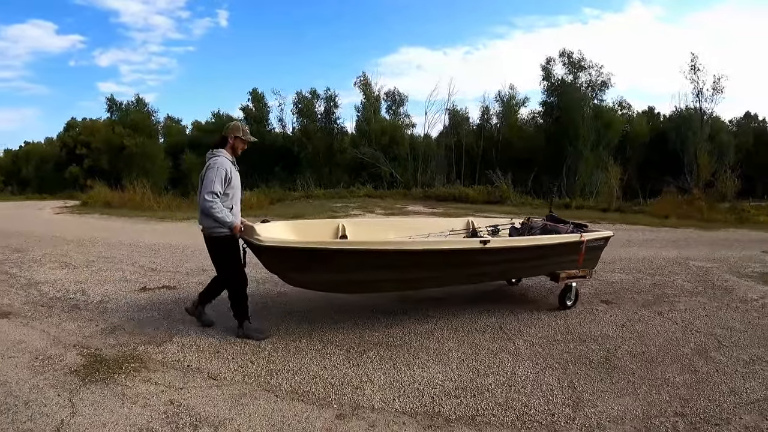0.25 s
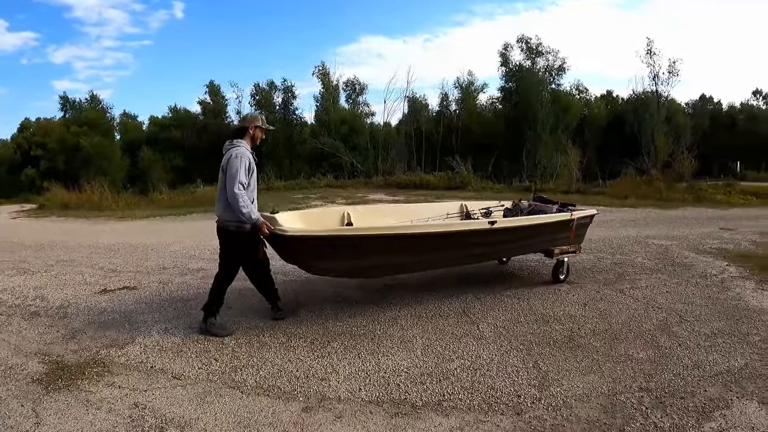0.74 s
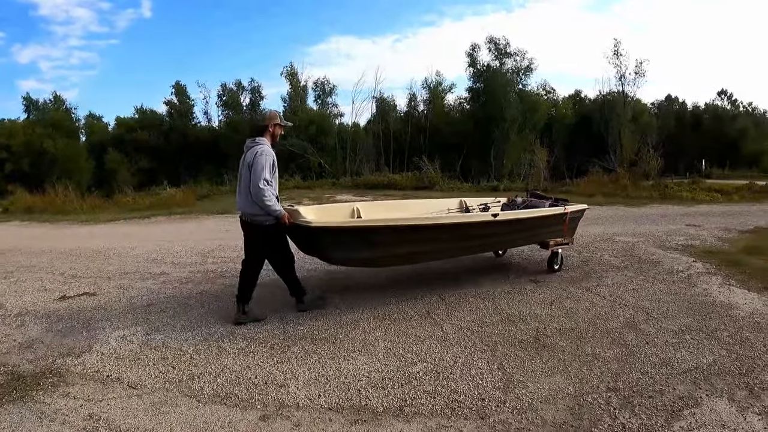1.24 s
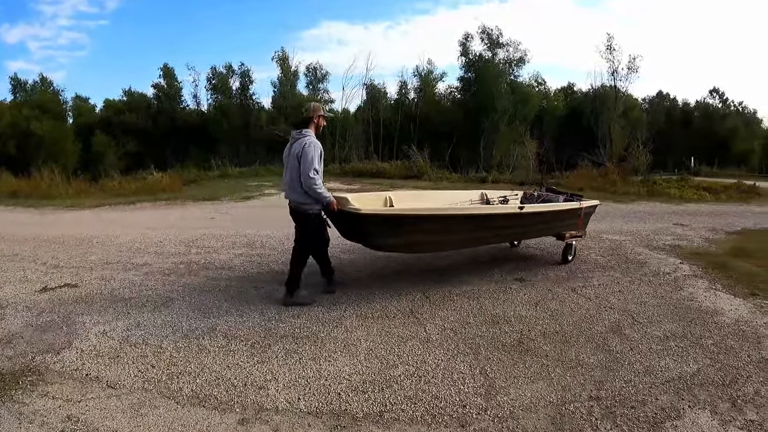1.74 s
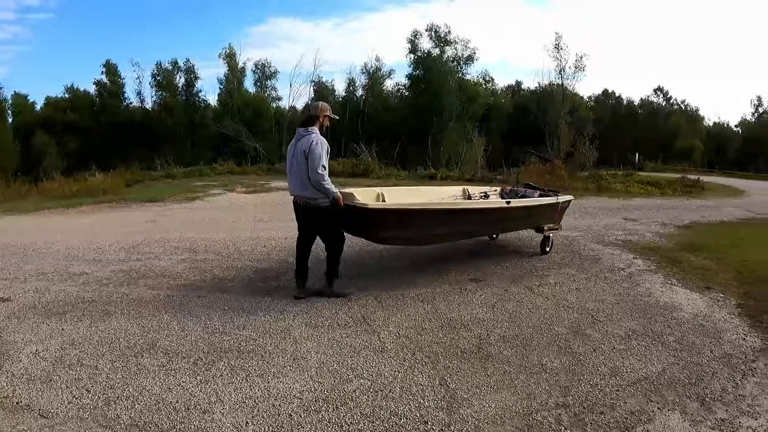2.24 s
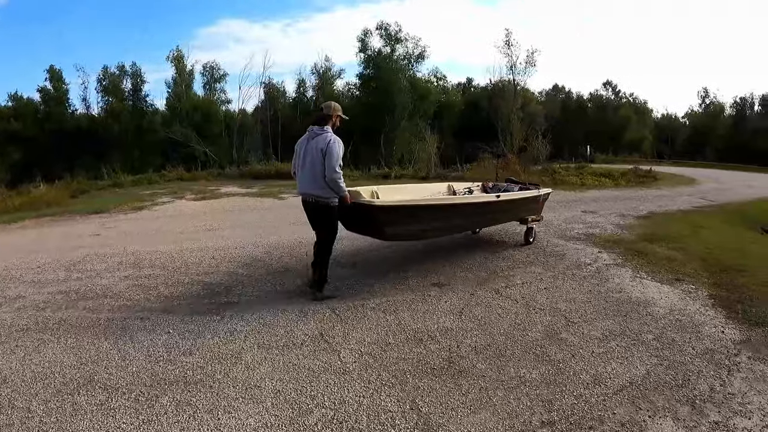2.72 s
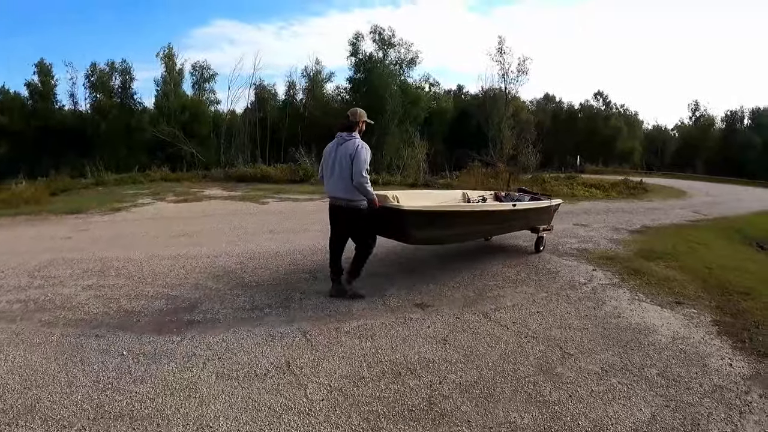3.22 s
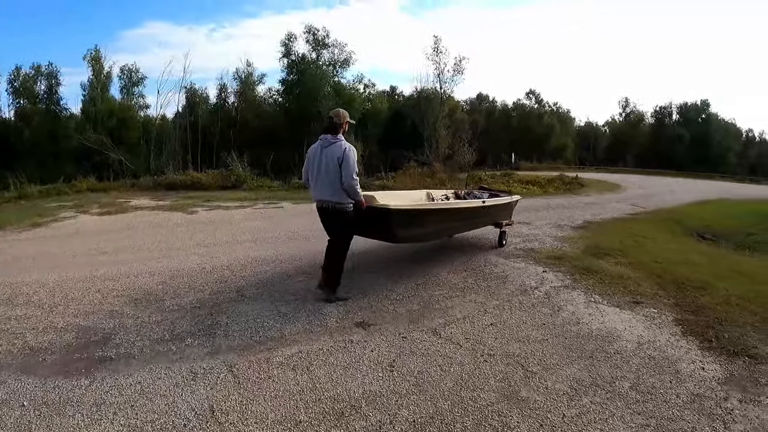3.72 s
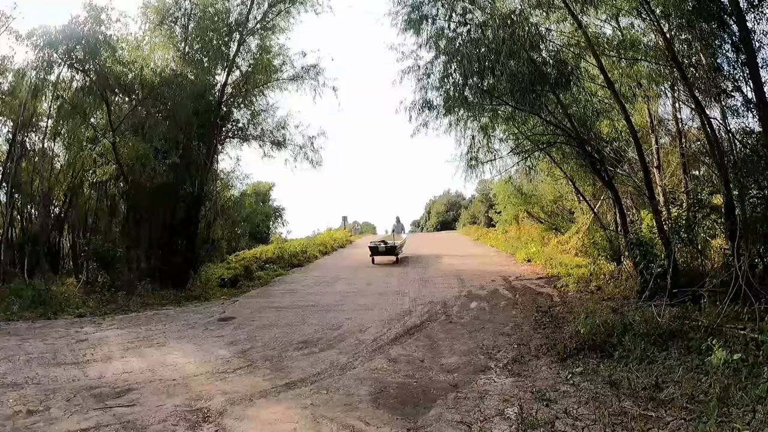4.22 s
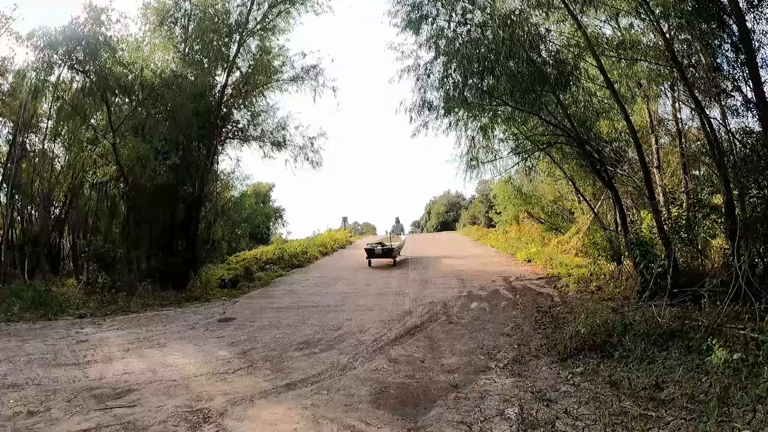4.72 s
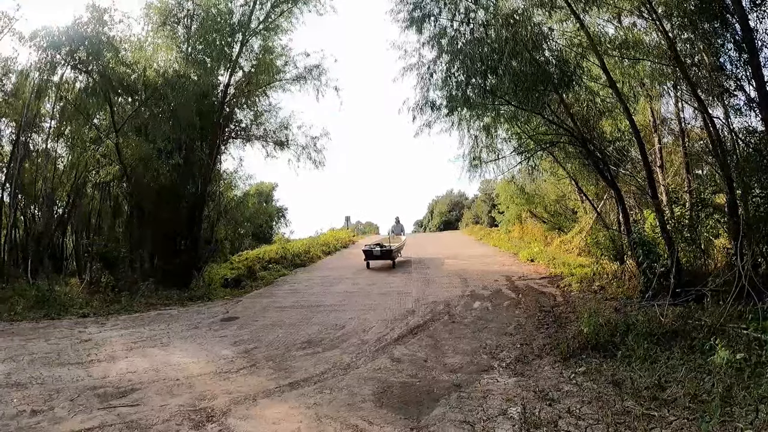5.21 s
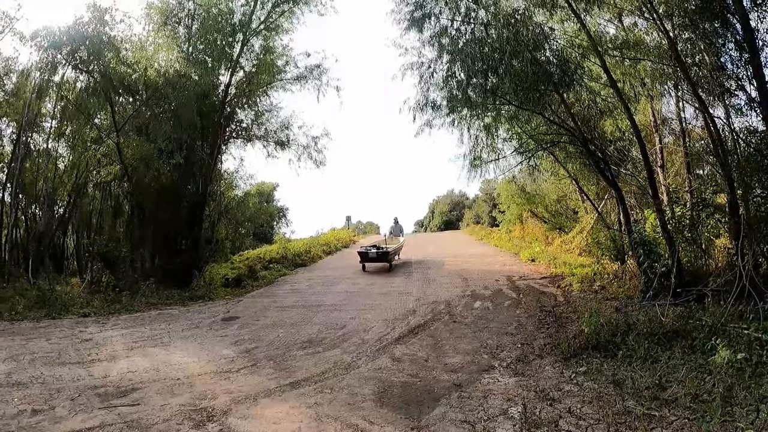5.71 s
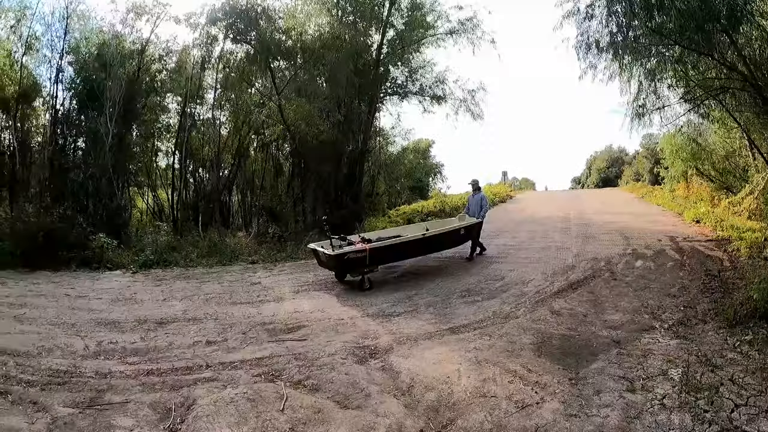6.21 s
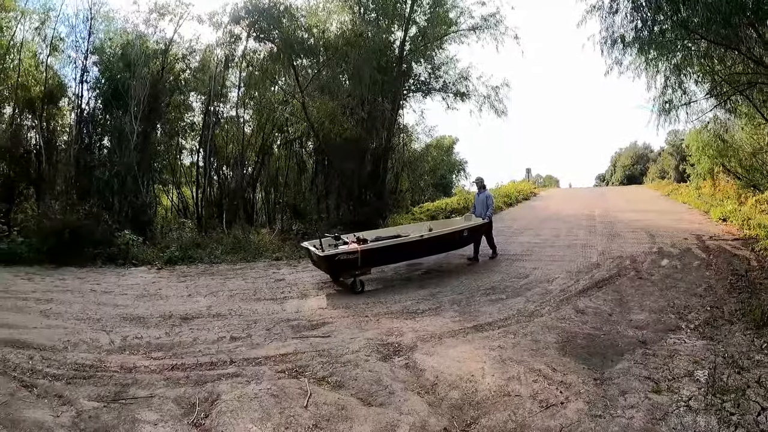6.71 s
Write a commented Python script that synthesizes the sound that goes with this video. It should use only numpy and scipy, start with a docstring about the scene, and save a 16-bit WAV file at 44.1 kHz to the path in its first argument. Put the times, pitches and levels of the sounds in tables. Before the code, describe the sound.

Small wheels rumble and crunch loudly over gravel under a booming hollow hull in wind, then abruptly a quiet lane with distant knocks and insects.

```python
"""A small boat is pushed on dolly wheels over a gravel road: grains and pebble ticks make the crunch,
shaped noise the boom and rattle of the hull, short resonances the stones and thuds, noise the wind.
Then, suddenly, a quiet lane: the boat drones and knocks far off under a soft hiss,
with a katydid of rasping noise strokes, a cricket of sagging tones and an echo from the trees."""
import sys
import numpy as np
from scipy import signal
from scipy.fft import rfft, irfft, next_fast_len
from scipy.io import wavfile
from scipy.ndimage import uniform_filter1d, minimum_filter1d, map_coordinates

SR = 44100
rng = np.random.default_rng(int(sys.argv[2]) if len(sys.argv) > 2 else 0)


def output_pcm(signal):
    """Save a mono or channel-first signal as 16-bit PCM at the path in sys.argv[1].

    Samples are clipped to [-1, 1] before scaling.
    """
    pcm = np.clip(np.atleast_2d(signal).T, -1, 1) * 32767
    wavfile.write(sys.argv[1], SR, np.round(pcm).astype(np.int16))


N = 306495
CUT_S = 4.197  # the near place gives way to the quiet lane

# All levels are before panning and limiting; spectra shape the tone, not the loudness.
# the wheels dig into loose patches with a duller crunch: middle_s, level_db
WHEEL_DIGS = [(0.32, -44), (2.072, -48.5), (2.56, -51), (3.141, -49.5), (3.52, -51.5), (4.33, -61.5),
              (4.791, -60), (5.07, -56.5), (5.451, -59.5), (5.6, -55.5), (6.026, -55), (6.361, -58),
              (6.89, -53)]
# hollow knocks of the far boat: start_s, peak_db, pitch_hz
BOAT_KNOCKS = [(4.313, -34, 940), (5.399, -36, 950), (5.744, -35, 947)]
# tone of crunching stones: frequency_hz, relative_gain_db
CRUNCH_TONE = [(300, 3.5), (700, -3.5), (1150, 4.5), (3300, -9), (8000, -20), (14000, -52)]


def amp(db):
    """Decibels to amplitude."""
    return 10 ** (np.asarray(db) / 20)


def unit(x):
    """Scale a sound to rms 1."""
    return x / np.sqrt(np.mean(x ** 2) + 1e-20)


def clock():
    """The time of every sample in seconds."""
    return np.arange(N) / SR


def wobble(rate):
    """A smooth random curve, rate knots a second."""
    return map_coordinates(rng.standard_normal(int(N * rate / SR) + 4), [clock() * rate])


def coloured(x, spectrum):
    """Pass x through a causal (minimum-phase) filter with the given (Hz, dB) gain."""
    m = 2 * next_fast_len(min(x.shape[-1], (x.shape[-1] + SR // 2) // 2), real=True)
    hz, db = np.transpose(spectrum)
    gain = amp(np.interp(np.log(np.fft.rfftfreq(m, 1 / SR) + 1), np.log(hz), db))
    # folding the cepstrum forward in time makes the filter causal
    cepstrum = irfft(np.log(gain), m)
    cepstrum[1:m // 2] *= 2
    cepstrum[m // 2 + 1:] = 0
    response = np.exp(rfft(cepstrum))
    return irfft(rfft(x, m) * response, m)[..., :x.shape[-1]]


def noise(spectrum):
    """Steady coloured noise of rms 1."""
    return unit(coloured(rng.standard_normal(N), spectrum))


def peaked(spectrum, hz, peak_db, octaves):
    """A spectrum with one resonance added at hz."""
    f, db = np.transpose(spectrum)
    grid = np.geomspace(f[0], f[-1], SR // 400)
    base_db = np.interp(np.log(grid), np.log(f), db)
    resonance_db = peak_db / (1 + (np.log2(grid / hz) / octaves) ** 2)
    return np.column_stack([grid, base_db + resonance_db])


def grains(spectrum, rate, spread_db, bed_db, life, size=N):
    """Random contacts of very unequal size, each a short burst, over a bed of countless tiny ones."""
    sizes = amp(spread_db * np.minimum(rng.exponential(size=size), 3))
    contacts = sizes ** 2 * (rng.random(size) < rate / SR)
    energy = signal.lfilter([1], [1, -np.exp(-2 / (life * SR))], contacts)
    bursts = unit(np.sqrt(energy) * rng.standard_normal(size))
    bed = amp(bed_db) * rng.standard_normal(size)
    return unit(coloured(bursts + bed, spectrum))


def patchy():
    """White noise of rms 1 that flickers in small patches of time and pitch."""
    z = signal.stft(rng.standard_normal(N), nperseg=512)[2]
    patches = uniform_filter1d(rng.standard_normal(z.shape), size=10, axis=0)
    patches = uniform_filter1d(patches, size=5, axis=1)
    return unit(signal.istft(z * amp(2.5 * unit(patches)), nperseg=512)[1][:N])


def pebbles(spectrum, rate, spread_db, bed_db):
    """Stones tick in clusters, each at its own pitch, over a patchy bed of finer sand."""
    crowding = np.cumsum(amp(4 * wobble(25)))
    when, pitch, size, loose = rng.random((int(rate * N / SR), 4)).T
    start = np.searchsorted(crowding, when * crowding[-1])
    hz = 500 * (11000 / 500) ** pitch[:, None]  # 500 to 11000 Hz
    age = np.arange(SR // 100)
    cycles = hz * age / SR
    life = 1 + 5.7 * loose[:, None] ** 2  # in cycles: a bedded stone hardly rings, a loose one a little
    strength = amp(spread_db * np.minimum(-np.log(1 - size), 4))[:, None]
    ring = np.sin(2 * np.pi * cycles) * np.exp(-cycles / life)
    ticks = strength * hz / np.sqrt(life) * ring
    ticking = unit(np.bincount((start[:, None] + age).ravel(), ticks.ravel(), N)[:N])
    return unit(coloured(ticking + amp(bed_db) * patchy(), spectrum))


def shaken(s, db, build, settle):
    """Power of the hull's shaking: it builds up to time s, then settles."""
    age = clock() - s
    return amp(db) ** 2 * np.exp(-2 * np.maximum(-age / build, age / settle))


def add(track, s, sound):
    """Mix a sound into a track from time s on."""
    part = track[max(round(s * SR), 0):][:len(sound)]
    part += sound[:len(part)]


def wide(mid, side):
    """Left and right from a mid and a side signal."""
    return np.array([mid + side, mid - side])


def wind():
    """Eddies beat on the microphone in uneven lumps."""
    # slow swells of the wind: time_s, level_db
    gusts = [(0.0, -30), (0.16, -20), (1.43, -20.5), (2.08, -22.5), (2.86, -19), (3.69, -30), (3.98, -26),
             (4.17, -29.5)]
    # low rumble: frequency_hz, relative_gain_db
    buffet_tone = [(12, -27), (26, -0.5), (60, 1.5), (100, -6), (160, -16), (300, -42), (800, -86)]
    gust_s, gust_db = np.transpose(gusts)
    lumps = amp(1.33 * wobble(18))
    return amp(np.interp(clock(), gust_s, gust_db)) * unit(lumps * noise(buffet_tone))


def near_dolly():
    """Wheels crush stones and grit; the shaken hull booms and, shaken harder, rattles ever more."""
    # rough patches of road that set the hull booming: worst_s, boom_db, build_up_s
    rough_patches = [(0.394, -19.5, 0.15), (0.619, -23.5, 0.06), (1.5, -28.5, 0.036), (1.629, -28.5, 0.038),
                     (2.355, -21.5, 0.094), (2.72, -29, 0.27), (3.3, -31.5, 0.52), (3.839, -33, 0.047)]
    # tones of hull boom, hull rattle, stones and fine grit: frequency_hz, relative_gain_db
    boom_tone, rattle_tone = [(50, -17.5), (105, 2), (200, -1.5), (290, -8), (500, -29.5), (1200, -82.5)], [(170, -7), (380, 6), (520, 1), (780, -5), (1100, -21.5),
                                            (6000, -93.5)]
    gravel_tone, grit_tone = [(300, -1), (550, 1), (900, 7.5), (1800, 1.5), (2300, -9.5), (3100, -9.5),
                              (5000, -30.5), (12000, -37)], [(1000, -4.5), (3000, -4.5), (4500, -8), (8700, -19.5),
                                              (9500, -29), (14000, -52)]
    # the dolly passes the microphone and rolls away
    nearest_s, nearest_m, walk_m_per_s = 1.72, 3.85, 1.22
    # on even road with the dolly at its nearest; the rattle at that same shake
    boom_db, rattle_db, grit_db = -36, -51.5, -57
    rattle_db_per_boom_db = 1.306
    # the wheels run from fine gravel onto coarse: middle and length of the change, level on each
    coarse_s, coarse_takes_s = 1.25, 0.56
    fine_db, coarse_db = -55, -50

    nearness = nearest_m / np.hypot(nearest_m, walk_m_per_s * (clock() - nearest_s))
    rough_power = sum(shaken(*patch, settle=0.11) for patch in rough_patches)
    shake = np.sqrt((amp(boom_db) * nearness) ** 2 + rough_power)
    boom = shake * grains(boom_tone, rate=150, spread_db=6, bed_db=-2.0, life=0.0037)

    rattle_level = amp(rattle_db) * (shake / amp(boom_db)) ** rattle_db_per_boom_db
    rattle = rattle_level * grains(rattle_tone, rate=200, spread_db=3, bed_db=-5.5, life=0.0028)

    coarse = np.clip((clock() - coarse_s) / coarse_takes_s + .5, 0, 1)
    gravel_db = fine_db + (coarse_db - fine_db) * coarse + wobble(20)
    gravel = amp(gravel_db) * pebbles(gravel_tone, rate=400, spread_db=3, bed_db=-3.5)
    grit = amp(grit_db) * pebbles(grit_tone, rate=1000, spread_db=3.0, bed_db=7.5)
    return boom + rattle + nearness * (gravel + grit)


def stones():
    """A pinched stone cracks and rings for an instant; on the packed lane it is a dry tick."""
    # stones that snap under wheels and shoes: start_s, peak_db, pitch_hz
    snaps = [(0.087, -37.5, 2930), (0.221, -28.5, 1860), (0.3208, -27.5, 2490), (0.345, -25, 1364),
             (0.441, -42, 3040), (0.963, -34.5, 1760), (1.304, -33, 1370), (1.983, -33.5, 1680),
             (2.058, -29.5, 1300), (2.141, -28, 1590), (2.263, -30, 1380), (2.972, -29, 3260),
             (3.161, -32, 1370), (3.645, -35.5, 2440), (3.967, -31.5, 1280), (3.99, -31.5, 1080),
             (4.725, -44.5, 4500), (4.8568, -40.5, 3300), (5.017, -41, 2450), (5.629, -48, 3000),
             (5.8406, -38.5, 2920), (5.981, -38.5, 1370), (6.356, -39, 2320), (6.4594, -43, 5170),
             (6.531, -40.5, 4140), (6.563, -46, 3170), (6.7317, -40, 2330), (6.781, -35.5, 1940),
             (6.84, -41.5, 3860)]
    loose_t60_s, packed_t60_s = 0.041, 0.0064
    out, t = np.zeros(N), np.arange(SR // 10) / SR
    for s, db, hz in snaps:
        t60 = loose_t60_s if s < CUT_S else packed_t60_s
        fade = amp(-60 * t / t60) * (1 - np.exp(-t / (0.025 * t60)))
        body = [(hz / 6, -24), (hz / 1.6, -11), (hz, 0), (hz * 1.35, -9), (hz * 2.2, -17), (13000, -58)]
        snap = coloured(fade * rng.standard_normal(len(t)), body)
        add(out, s, amp(db) * snap / np.abs(snap).max())
    return out


def scuffs():
    """Small stones grind in short scrapes under a shoe, each with its own ring, and dully under a wheel."""
    # loose gravel that slides under a shoe: middle_s, level_db, half_length_s, pitch_hz
    scrapes = [(0.232, -49, 0.013, 6030), (0.357, -46, 0.028, 3180), (0.393, -43, 0.0077, 5900),
               (0.972, -41.5, 0.0081, 3600), (3.001, -36.5, 0.011, 990), (3.016, -40, 0.0072, 7550),
               (3.034, -43.5, 0.017, 5300), (5.044, -45.5, 0.011, 2730), (6.889, -61.5, 0.04, 4400)]
    # tone of a scrape: frequency_hz, relative_gain_db
    scrape_tone = [(300, -11.5), (900, 7.5), (1800, -2), (3200, -0.5), (7500, -13.5), (9500, -23.5),
                   (14000, -47)]
    shoe, t = np.zeros(N), np.arange(-SR // 10, SR // 10) / SR
    for s, db, half_length, hz in scrapes:
        ringing_tone = peaked(scrape_tone, hz, peak_db=8.0, octaves=0.29)
        scrape = grains(ringing_tone, rate=600, spread_db=3.0, bed_db=-7, life=0.0019, size=len(t))
        swell = np.exp(-.5 * (t / half_length) ** 2)
        add(shoe, s + t[0], amp(db) * swell * scrape)
    dig = sum(amp(db) * np.exp(-.5 * ((clock() - s) / 0.047) ** 2) for s, db in WHEEL_DIGS)
    return shoe + dig * pebbles(CRUNCH_TONE, rate=600, spread_db=4.5, bed_db=-6)


def swishes():
    """Brief, very high brushing sounds as the walker moves, perhaps of cloth."""
    # middle_s, level_db
    brushes = [(0.312, -65.5), (1.262, -67.5), (3.017, -60.5)]
    strokes = sum(amp(db) * np.exp(-.5 * ((clock() - s) / .011) ** 2) for s, db in brushes)
    return strokes * noise([(8500, -25.5), (11000, 0.5), (12600, -7.5), (14000, -26.5)])


def thuds():
    """A bump is one dull push, and a hull panel rings briefly after it; each reaches its own upper edge."""
    # wheel bumps that thud in the hull: start_s, peak_db, upper_edge_hz
    bumps = [(0.484, -20, 725), (0.592, -22, 1220), (0.605, -11, 1500), (0.645, -24, 1140),
             (0.688, -24, 930), (1.326, -25.5, 1050), (1.478, -22, 780), (1.531, -27, 940),
             (1.565, -25.5, 1250), (1.617, -13.5, 1310), (2.345, -17, 920), (2.389, -20, 715),
             (2.732, -25, 840), (3.185, -25, 766)]
    # ringing of the hull panel: times_the_upper_edge, relative_level_db
    panel_modes = [(.28, 1.5), (.43, 2), (.62, -8.5), (.93, -11.5)]
    out, t = np.zeros(N), np.arange(SR // 8) / SR
    for s, db, hz in bumps:
        push_tone = [(70, -9), (230, 2), (hz, -7), (hz * 1.18, -22), (hz * 4, -65)]
        push = coloured(1.0 * (t == 0), push_tone)
        ring = np.zeros(len(t))
        for k, (ratio, level_db) in enumerate(panel_modes):
            strength = (-1) ** k * amp(level_db + rng.standard_normal())
            ring += strength * np.sin(2 * np.pi * hz * ratio * t)
        fade = amp(-60 * t / 0.024) * (1 - np.exp(-t / 0.00073))
        thud = push / np.abs(push).max() + .6 * ring * fade
        add(out, s + 0.001, amp(db) * thud / np.abs(thud).max())
    return out


def far_dolly():
    """From afar the hull is a low drone over ticking stones; both swell at each crunch and knock."""
    # tone of the hull: frequency_hz, relative_gain_db
    drone_tone = [(28, -10.5), (60, -1), (155, 3), (210, -3.5), (290, -13.5), (900, -57.5)]
    # on even road: level as the lane begins, and its rise as the boat comes nearer
    drone_db, approach_db_per_s = -46.5, 1.57
    # shake over a crunch's level and over a knock's peak
    crunch_shake_db, knock_shake_db = 15, -5.5
    build_s, settle_s = 0.1, 0.074

    even = amp(drone_db + approach_db_per_s * (clock() - CUT_S))
    lane_digs = [(s, db) for s, db in WHEEL_DIGS if s > CUT_S]
    dug = sum(shaken(s, db + crunch_shake_db, build_s, settle_s) for s, db in lane_digs)
    knocked = sum(shaken(s, db + knock_shake_db, build_s, settle_s) for s, db, hz in BOAT_KNOCKS)
    shake = np.sqrt(even ** 2 + dug + knocked)

    drone = wide(noise(drone_tone), amp(-19.0) * noise(drone_tone))
    flurries = amp(2.0 * wobble(25)) * pebbles(CRUNCH_TONE, rate=420, spread_db=4.5, bed_db=-4)
    crackle = wide(flurries, amp(-4.0) * noise(CRUNCH_TONE))
    return shake * (drone + amp(-23.0) * crackle)


def lane_air():
    """The open lane is a soft, steady, wide hiss of coloured noise."""
    # frequency_hz, relative_gain_db
    air_tone = [(450, -1), (850, -10), (1300, 2), (2200, -6), (5000, -10.5), (7500, -12), (8600, -21),
                (10500, -17), (12500, -27), (14500, -45)]
    return amp(-63.5) * wide(noise(air_tone), amp(-3.5) * noise(air_tone))


def trees(x):
    """The trees along the lane scatter a short echo, different at each side."""
    t = np.arange(SR // 2) / SR
    scatter = rng.standard_normal((2, len(t))) * amp(-60 * t / 0.1)
    tail = coloured(scatter, [(500, 6.2), (10000, 15)])
    return signal.fftconvolve(x[None], tail / np.linalg.norm(tail[0]), axes=1)[:, :N]


def katydid():
    """Each wing stroke is a high rasp with a thin ring in it, about thirteen a second, none quite alike."""
    # first_stroke_s, last_stroke_s, level_db (before the blur), share_blurred_into_next_stroke, wing_ring_hz
    phrases = [(4.248, 5.716, -71, 0.21, 9900), (6.05, 6.909, -77.5, 0.49, 10400)]
    # tone of the wing: frequency_hz, relative_gain_db
    rasp_tone = [(6000, -49), (8300, -3.5), (9900, 2.5), (12400, -2.5), (14000, -25)]
    out, t = np.zeros((2, N)), np.arange(-SR // 12, SR // 12) / SR
    for first, last, db, blur, hz in phrases:
        strokes = np.zeros(N)
        count = round((last - first) * 12.9) + 1
        for s in np.linspace(first, last, count):
            late, force, drawn = rng.standard_normal(3)
            length = 0.021 * np.exp(.1 * drawn)
            stroke = np.exp(-np.abs(t / length) ** 3) + blur * np.exp(-(t / 0.04) ** 2)
            add(strokes, s + t[0] + 0.003 * late, amp(db + .5 * force) * stroke)
        wing = peaked(rasp_tone, hz, peak_db=5.5, octaves=0.02)
        out += strokes * wide(noise(wing), amp(-7) * noise(wing))
    return out * amp(np.array([[1], [-1]]) * 0.76)  # a little to the left


def cricket():
    """A slightly hoarse chirp that sags in pitch as the wing slows."""
    # chirps in pairs: first_chirp_middle_s, level_db
    pairs = [(4.304, -72), (4.653, -68.5), (5.011, -68), (5.529, -70), (6.026, -65.5), (6.268, -65),
             (6.499, -66), (6.721, -63.5)]
    out, t = np.zeros(N), np.arange(-SR // 20, SR // 20) / SR
    hz = 4610 - 1500 * t - 110000 * t ** 2 * (t > 0)
    for s, db in pairs:
        for delay in (0, .082):
            hoarseness = 0.025 * np.cumsum(rng.standard_normal(len(t)))
            phase = 2 * np.pi * np.cumsum(hz) / SR + hoarseness
            chirp = np.exp(-(t / 0.026) ** 2) * np.sin(phase)
            add(out, s + delay + t[0], amp(db + rng.standard_normal()) * chirp)
    return out


def knocks():
    """The boat knocks on its dolly with a short hollow ring and clatters as it settles."""
    # ringing of the hull: times_the_pitch, relative_level_db, t60_s
    hull_modes = [(1, -0.5, 0.042), (1.28, 1, 0.044)]
    # contacts of one knock: delay_s, relative_peak_db
    bounces = [(0, 1), (.007, -12.5)]
    out, t = np.zeros(N), np.arange(SR // 4) / SR
    for s, db, hz in BOAT_KNOCKS:
        for delay, bounce_db in bounces:
            ring = np.zeros(len(t))
            for ratio, level_db, t60 in hull_modes:
                fade = amp(level_db + 2 * rng.standard_normal() - 60 * t / t60)
                mode_hz = hz * ratio * (1 + 0.029 * rng.standard_normal())
                ring += fade * np.sin(2 * np.pi * (mode_hz * t + rng.random()))
            crack = unit(coloured(rng.standard_normal(len(t)), CRUNCH_TONE)) * amp(-60 * t / 0.026)
            knock = (ring + 0.89 * crack) * (1 - np.exp(-t / 0.0003))
            add(out, s + delay, amp(db + bounce_db) * knock / np.abs(knock).max())
    return out


def scene():
    """The near road, then within 4 ms the quiet lane, panned a little to the left."""
    lane = np.clip((clock() - CUT_S) / .004 + .5, 0, 1)
    hits = stones() + scuffs() + knocks()
    near = wind() + near_dolly() + thuds() + hits + swishes()
    echo = amp(-3) * trees(hits)
    far = far_dolly() + lane_air() + katydid() + cricket() + hits + echo
    pan = amp(np.array([[1], [-1]]) * 0.48)
    return (1 - lane) * near + lane * far * pan


def record(dry):
    """A limiter holds down the peaks of both sides together; nothing is kept above the band limit."""
    top_hz = 14300
    needed = np.minimum(1, .33 / (np.abs(dry).max(axis=0) + 1e-9))
    held = minimum_filter1d(needed, size=SR // 200)  # 5 ms around each peak
    gain = uniform_filter1d(held, size=SR // 200)
    m = next_fast_len(N + SR // 2)
    in_band = np.fft.rfftfreq(m, 1 / SR) < top_hz
    return irfft(rfft(dry * gain, m) * in_band, m)[:, :N]


dry = scene()
out = record(dry)
output_pcm(out)
```